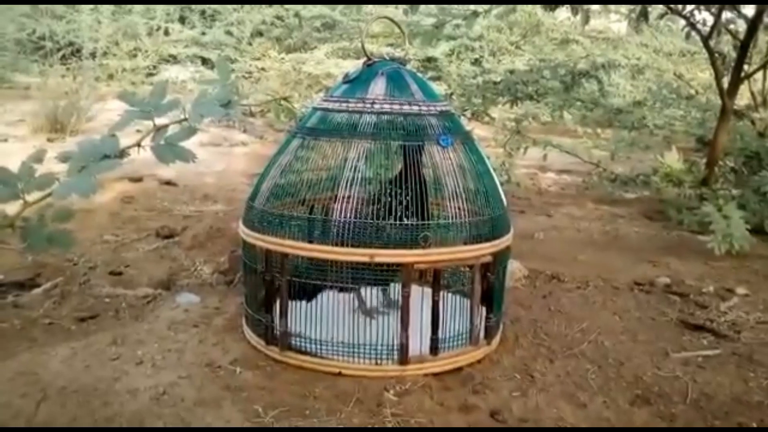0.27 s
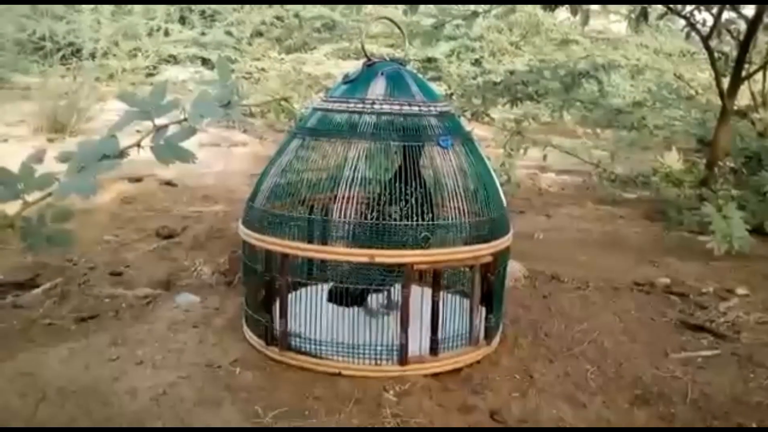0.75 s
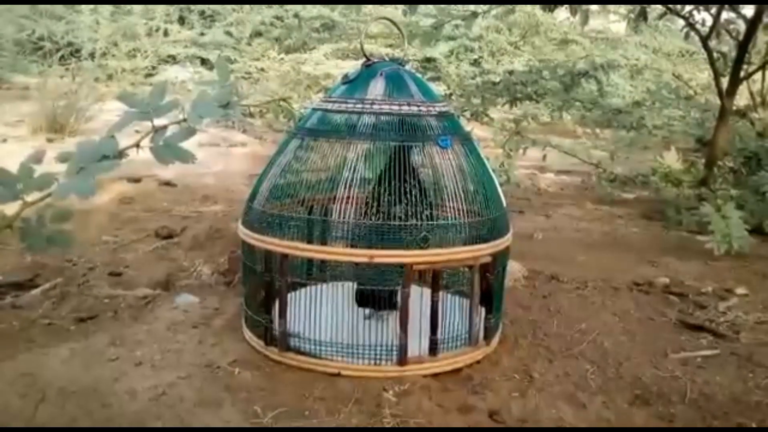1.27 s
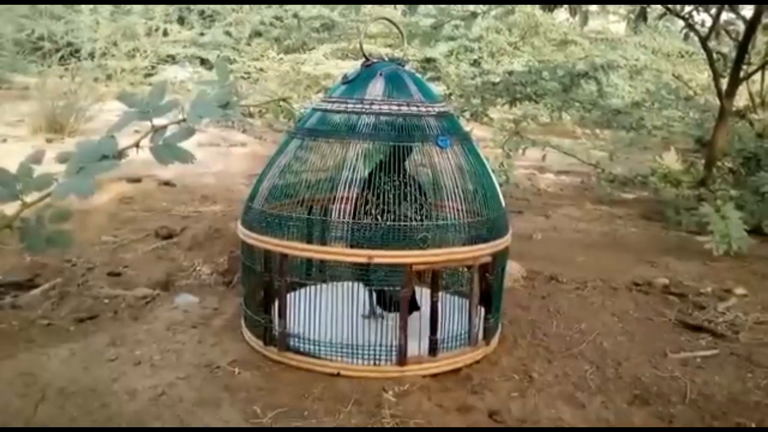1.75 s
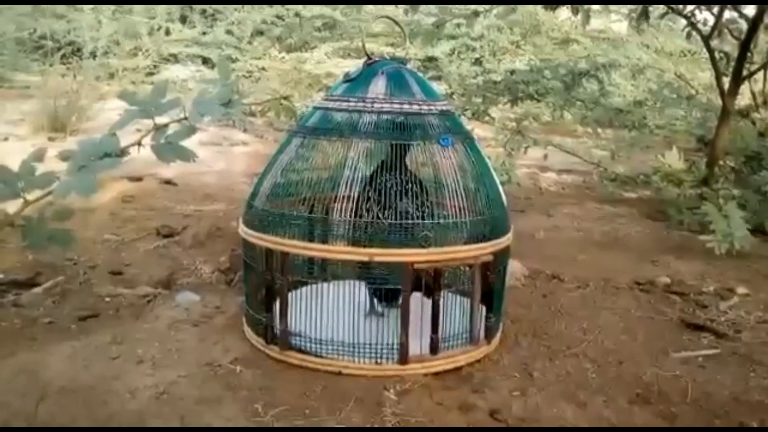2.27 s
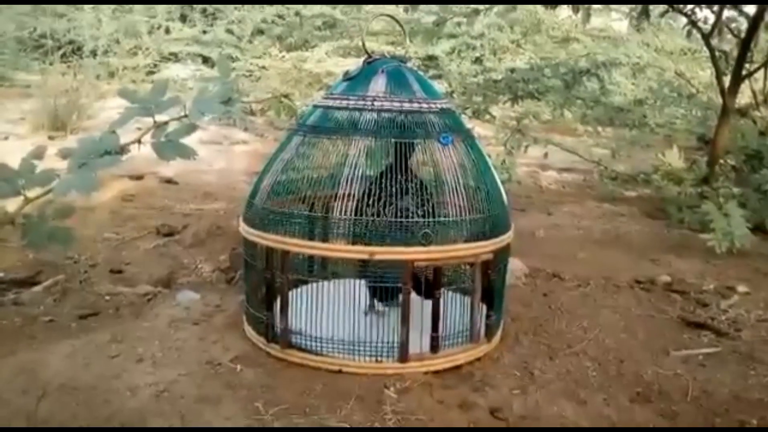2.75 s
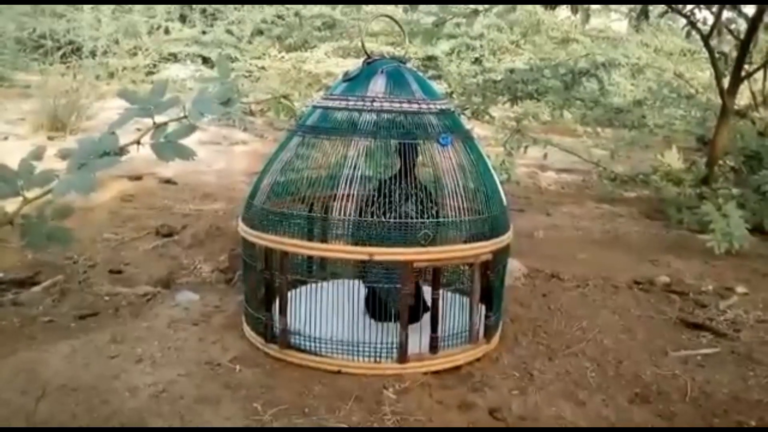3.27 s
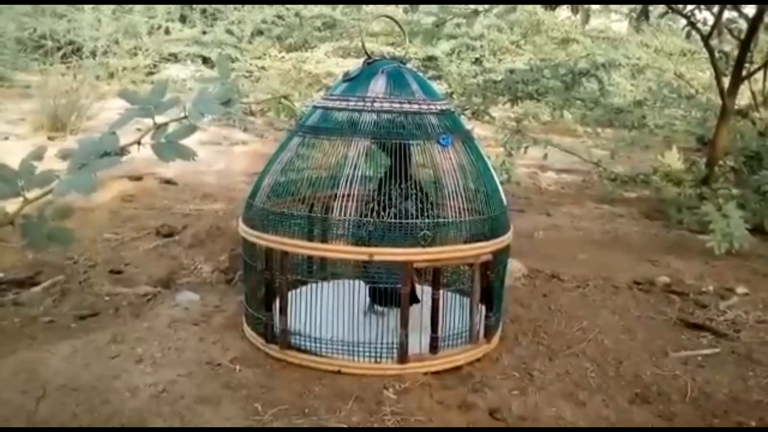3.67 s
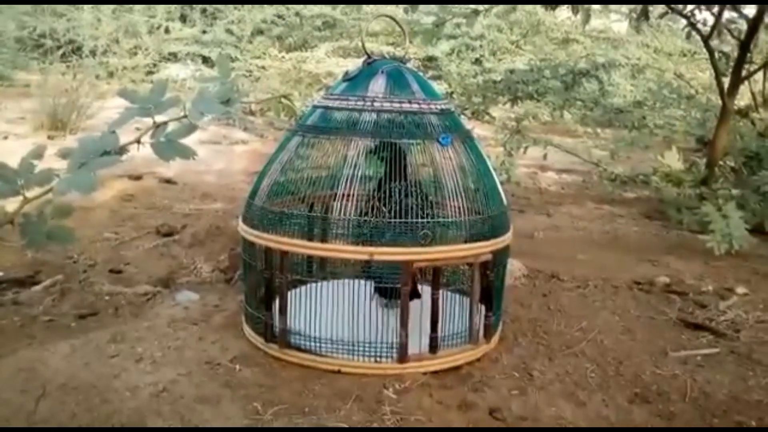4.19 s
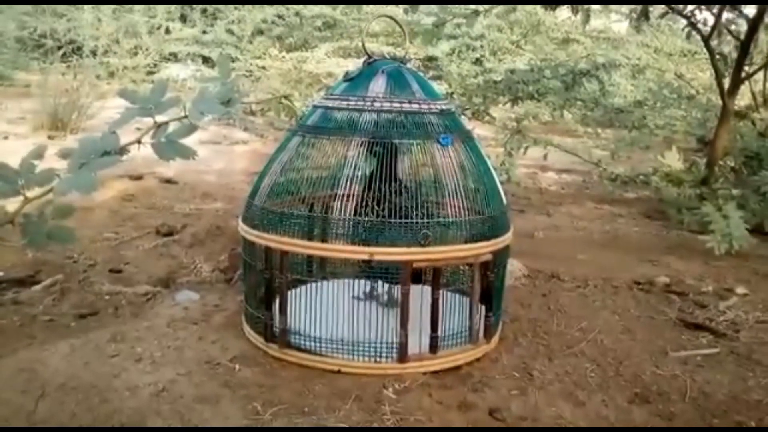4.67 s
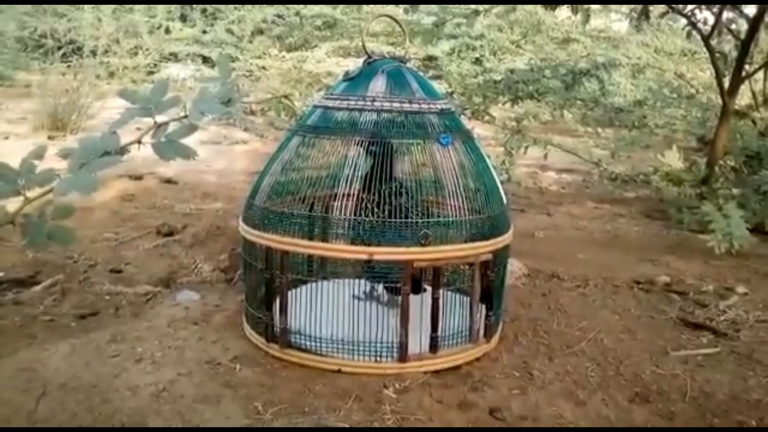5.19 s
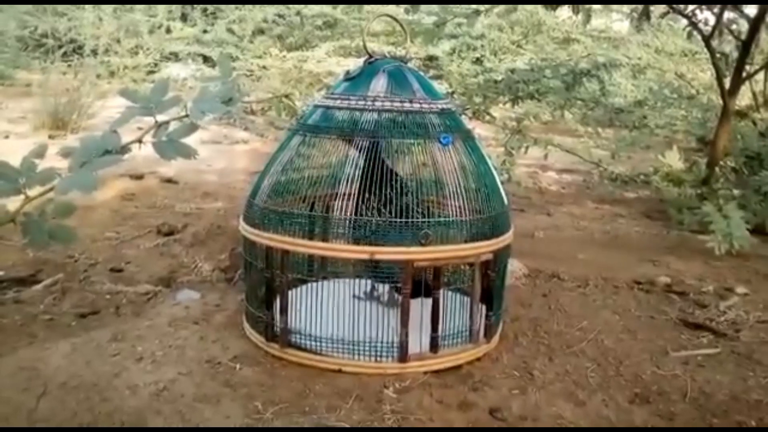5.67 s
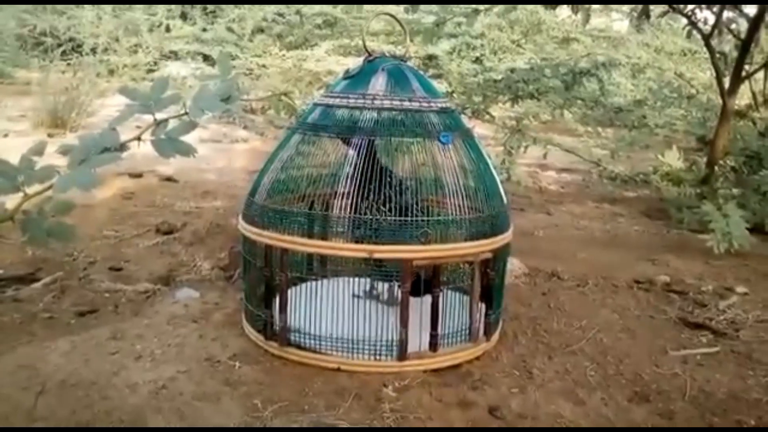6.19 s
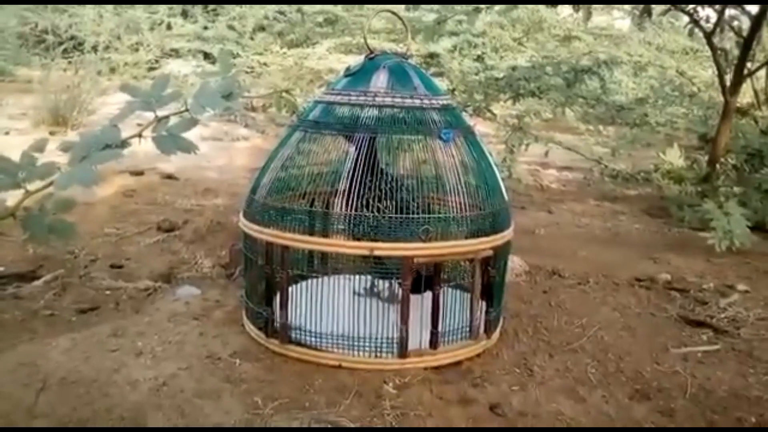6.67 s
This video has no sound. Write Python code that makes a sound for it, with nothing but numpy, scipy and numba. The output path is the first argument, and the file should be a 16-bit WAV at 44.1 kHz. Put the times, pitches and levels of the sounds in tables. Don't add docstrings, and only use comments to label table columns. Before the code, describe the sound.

A caged francolin close by clucks, then lets out harsh, overloaded rasping cries outdoors, with a far nasal piping bird, faint twitter and low hum.

```python
import sys
import numpy as np
from scipy import signal
from scipy.fft import rfft, irfft
from scipy.io import wavfile
from scipy.ndimage import uniform_filter1d
from numba import njit

SR = 44100
rng = np.random.default_rng(int(sys.argv[2]) if len(sys.argv) > 2 else 0)


def transcribe(u):
    v = np.clip(np.atleast_2d(u).T, -1, 1)
    q = np.round(v * 32767).astype(np.int16)
    wavfile.write(sys.argv[1], SR, q)


def convert_level_to_amplitude(level_db):
    exponent = np.asarray(level_db, float) / 20
    return 10 ** exponent


N = 306054
T = np.arange(N) / SR

# start_s, length_s, level_db, snaps_per_s, speedup_per_s (at mid-syllable)
RASPS = [
    (2.257, 0.16, -7, 292, 90),
    (2.61, .180, -7, 303, -5),
    (2.82, 0.037, -6, 340, -0.5),
    (3.107, 0.099, -7, 271, 90),
    (3.264, .071, -7.5, 310, 14.5),
    (3.352, 0.099, -8, 310, -50),
]
# centre_hz, width_hz, level_db
THROAT_MODES = [(3150, 400, -12), (4200, 600, 0), (4900, 400, -2), (6300, 350, -10)]
# time_s, pitch_hz, level_db
CLUCK_CURVE = [(1.787, 1453, -36), (1.791, 1458, -9), (1.796, 1155, -13.5), (1.798, 835, -11.5),
               (1.808, 809, -14), (1.810, 788, -19.5), (1.813, 720, -19), (1.816, 782, -23.5),
               (1.827, 766, -31)]
# frequency_hz, level_db
CLUCK_THROAT = [(800, -72.5), (1650, -8), (2500, -6.5), (3300, -8), (4200, 5), (5000, 3), (5900, -7),
                (6700, -9.5), (7600, -50.5)]
# start_s, length_s, top_hz, level_db
WHISTLES = [
    (1.8328, .0308, 6500, -11),
    (2.786, .033, 6390, -12.5),
    (3.332, .022, 6490, -12.5),
]
# start_s, ring_s, pitch_hz, level_db
YELPS = [
    (1.8302, .0016, 4050, -1),
    (1.8648, .006, 4100, -1.5),
]
# arrival_s, buildup_s, level_db, decay_db_per_s
ECHOES = [
    (0, .001, -48, 1399),
    (0, .001, -63, 118.5),
    (.418, .04, -83, 74),
]
# time_s, peak_db
CLAW_TICKS = [
    (5.1394, -45),
    (5.6717, -31.5),
    (5.74, -36),
]
# start_s, length_s, second_partial_hz, level_db, brightness_db (per partial)
PIPES = [(0.194, 0.063, 2836, -40, -0.5), (0.319, 0.088, 2826, -46, -0.5), (1.211, 0.057, 2724, -42, -2.5),
         (1.332, 0.068, 2740, -43, 1), (1.454, 0.087, 2698, -45, 1), (2.216, .045, 2710, -47.5, -1.5),
         (2.499, 0.12, 2734, -40.5, -1), (3.501, 0.073, 2660, -57, 3.5)]
# start_s, length_s, second_partial_hz, level_db, brightness_db
SLIDES = [
    (.459, .261, 2755, -50, 0),
    (1.61, .17, 2780, -46, -2),
    (3.65, .175, 2680, -60, -2),
]
# start_s, length_s, second_partial_hz, level_db, brightness_db
COOS = [(1.03, .055, 2520, -57, -2), (1.082, .1, 2800, -56, -12), (4.765, .04, 2410, -61, -8),
        (5.62, .04, 2600, -65, -8), (5.69, .035, 2600, -65, -8), (5.785, .035, 2600, -65, -8),
        (6.205, .045, 2400, -63, -8)]
# length_share, pitch_ratio, swell_db
LEVEL_SHAPE = [(0, .975, 0), (.45, 1.005, 0), (.86, .993, 2), (1, .94, -7)]
# before_end_s, pitch_ratio, swell_db
SLIDE_SHAPE = [(.155, .97, 0), (.112, .895, -3), (.058, .735, -12), (.04, .74, -11), (.014, .82, -6),
               (0, .825, -5)]
# from_s, third_db, fourth_db, fifth_db (partials over the second)
HEAD_TURNS = [(0, -4, 0, -19), (1.0, 3, 2, -9), (2.2, -4, -12, -12), (3.4, -8, -4, -14)]
# start_s, length_s, top_hz, level_db
CHIRPS = [(0.314, 0.073, 5000, -54), (0.681, 0.038, 4550, -58), (.727, 0.047, 4350, -51),
          (.806, .048, 4670, -56), (.862, .045, 4450, -55), (.918, 0.051, 4430, -53.5),
          (1.065, .03, 4700, -53), (1.654, 0.043, 5250, -53.5), (2.163, 0.029, 4900, -54),
          (5.155, 0.031, 4700, -47), (5.19, .042, 5220, -57.5), (6.845, 0.027, 4920, -56)]
# start_s, length_s, start_hz, end_hz, level_db
GLIDES = [(1.047, .045, 4980, 3920, -70), (1.121, 0.032, 3750, 3560, -56), (2.004, .023, 3320, 4390, -56),
          (4.287, .021, 2484, 1950, -60), (4.792, 0.019, 3770, 4460, -52.5),
          (4.823, 0.051, 4650, 4320, -61), (5.039, 0.036, 2800, 2610, -66.5),
          (5.198, 0.084, 2440, 2290, -66), (5.222, .048, 4700, 3700, -46), (5.248, 0.04, 4170, 5380, -56),
          (5.306, .03, 4840, 4053, -52.5), (5.365, 0.0183, 3970, 5260, -49), (5.383, .061, 4490, 3480, -58),
          (5.862, .03, 4900, 3700, -60), (5.916, 0.017, 3734, 4480, -56), (5.948, .024, 3776, 2250, -53.5),
          (1.689, .045, 4890, 3800, -49.5), (1.625, .03, 4023, 4900, -49), (6.27, 0.023, 3860, 5780, -57.5),
          (6.3, 0.035, 5700, 4240, -62), (6.32, 0.039, 4120, 3740, -57), (6.372, 0.025, 3910, 4650, -62),
          (6.51, 0.036, 5170, 5170, -63), (6.886, .038, 3590, 4400, -54.5)]
# time_s, pitch_hz, level_db
DRONE_CURVE = [(0.0, 99.96, -60), (0.09, 102.4, -49), (1.7, 99.4, -49.5), (2.45, 102.8, -56.5),
               (3.44, 99.6, -50), (3.63, 101.7, -51.5), (5.7, 100.4, -51), (6.94, 101.9, -50.5)]
# multiple, level_db
DRONE_ORDERS = [(1, 0), (1.5, -11), (2, -11), (2.5, -13), (3, -14)]
# start_s, length_s, start_hz, end_hz, level_db
PASSING = [
    (2.6, 2.05, 148, 134, -48.5),
    (4.7, 1.3, 179, 170, -54),
    (6.0, .94, 172, 172, -59),
    (4.7, .12, 96, 90, -47),
]
# frequency_hz, density_db (per Hz)
AIR_SPECTRUM = [(15, -57), (25, -17), (37, -13), (101, -1), (174, -4), (274, -8.5), (305, -8.5), (649, -20),
                (784, -23.5), (2630, -26), (3440, -25.5), (6390, -29), (8150, -43.5), (14300, -45.5),
                (15500, -40)]

DUCK_DB = 12


def spans(tables, edge_s=0.00054):
    s, *columns = np.transpose(np.concatenate(tables))
    gate = 0
    for rows in tables:
        first_s, last_s = rows[0][0], rows[-1][0]
        gate = gate + np.interp(T, [first_s - edge_s, first_s, last_s, last_s + edge_s], [0, 1, 1, 0])
    return np.minimum(gate, 1), [np.interp(T, s, column) for column in columns]


def at_hz(points, hz):
    point_hz, point_db = np.array(points)[:, 0], np.array(points)[:, 1]
    return np.interp(np.log(hz + 1), np.log(point_hz), point_db)


def rms_one(x):
    return x / np.sqrt(np.mean(x ** 2) + 1e-20)


def drift(rate_hz):
    r = np.exp(-2 * np.pi * rate_hz / SR)
    noise = rng.standard_normal(N + SR)
    return rms_one(signal.lfilter([1], [1, -2 * r, r * r], noise)[SR:])


def band(x, low_hz, high_hz, order=2):
    return signal.sosfilt(signal.butter(order, [low_hz, high_hz], "band", fs=SR, output="sos"), x)


def tone(hz):
    return np.sqrt(2) * np.sin(2 * np.pi * np.cumsum(hz) / SR)


@njit
def swing(x, turn, r):
    y = np.zeros(len(x))
    for i in range(2, len(x)):
        y[i] = (1 - r * r) / 2 * (x[i] - x[i - 2]) + turn[i] * y[i - 1] - r * r * y[i - 2]
    return y


def resonance(x, hz, width_hz):
    r = np.exp(-np.pi * width_hz / SR)
    return swing(x, 2 * r * np.cos(2 * np.pi * hz / SR) + np.zeros(N), r)


def syllable(s, length, level_db, rate, speedup):
    attack_s, settle_db = .009, .8
    breaks = min(abs(s + length - w[0]) for w in WHISTLES) < .01
    resumes = min(abs(s - w[0] - w[1]) for w in WHISTLES) < .01
    onset_db = -3.5 if resumes else -14
    fade_s, sag_db, end_db = (.0045, 0, -9) if breaks else (.012, -5, -25)
    corners = [0, attack_s, length - fade_s - .016, length - fade_s, length]
    fastest_s = .55 * length
    age = np.sort(np.append(corners, fastest_s))
    shape_db = np.interp(age, corners, [onset_db, settle_db, 0, sag_db, end_db])
    snaps = rate + speedup * np.interp(age, [0, fastest_s, length], [0, 1, -.6])
    main_hz = 4240 + 0 * age
    upper_hz = 5420 + 20000 * age ** 2
    chest_db = 6 * (age <= attack_s)
    return np.transpose([s + age, level_db + shape_db, main_hz, upper_hz, snaps, chest_db])


def rasp(jitter=.011, uneven_db=1.0, breath_db=-24, sweep=.21, wander=.022, open_share=.66, leak=.4):
    gate, (level_db, main_hz, upper_hz, snaps, chest_db) = spans([syllable(*row) for row in RASPS])
    cycles = np.cumsum(snaps * (1 + jitter * drift(90))) / SR
    phase, count = cycles % 1, cycles.astype(int)
    strength = convert_level_to_amplitude(uneven_db * rng.standard_normal(count[-1] + 1))[count]
    unsteady = wander * drift(20) + .012 * drift(200)
    pitch_hz = main_hz * (1 + sweep * (np.minimum(phase, .8) - .4) + unsteady)
    chop = uniform_filter1d(np.where(phase < open_share, 1, leak) * strength, size=20)
    main = convert_level_to_amplitude(4) * tone(pitch_hz)
    second = convert_level_to_amplitude(-8) * tone(pitch_hz * upper_hz / main_hz)
    voice = chop * (main + second)
    breath = convert_level_to_amplitude(breath_db) * rng.standard_normal(N) * np.exp(-1.5 * phase)
    drive = (np.diff(count, prepend=0) > 0) * strength + breath
    rings = -convert_level_to_amplitude(-4) * resonance(drive, upper_hz, 450)
    for k, (hz, width_hz, db) in enumerate(THROAT_MODES):
        rings += (-1) ** k * convert_level_to_amplitude(db) * resonance(drive, hz, width_hz)
    low = convert_level_to_amplitude(-20) * rms_one(band(resonance(drive, 2620, 600), 2300, 3300, order=3))
    chest = convert_level_to_amplitude(chest_db - 39) * rms_one(resonance(resonance(drive, 1600, 300), 1620, 450))
    voice = band(rms_one(voice) + convert_level_to_amplitude(-4.5) * rms_one(rings), 3000, 5935, order=4) + low + chest
    even = np.sqrt(uniform_filter1d(voice ** 2, size=330))
    return gate * convert_level_to_amplitude(level_db + 1.5) * voice / even


def cluck():
    gate, (hz, level_db) = spans([CLUCK_CURVE])
    hz = hz * (1 + 0.012 * drift(190))
    smear = rng.uniform(0, 2 * np.pi, 10)
    turn = 2 * np.pi * np.cumsum(hz) / SR
    stack = sum(convert_level_to_amplitude(at_hz(CLUCK_THROAT, k * hz)) * np.sin(k * turn + smear[k]) for k in range(1, 10))
    hoarse = rms_one(band(resonance(rng.standard_normal(N), 4500, 1200), 2800, 6800, order=4))
    return gate * (convert_level_to_amplitude(level_db) * stack + convert_level_to_amplitude(.7 * level_db - 11) * hoarse)


def whistle():
    climb_hz_per_s, top_at, drop_s, drop_hz = 13000, .54, .002, 5200
    pure = []
    for s, length, hz, db in WHISTLES:
        top_s = top_at * length
        pure.append([(s, hz - climb_hz_per_s * top_s, db + 2), (s + top_s, hz, db),
                     (s + length - drop_s, .985 * hz, db + 4), (s + length, drop_hz, db + 4)])
    yelps = []
    for s, ring_s, hz, db in YELPS:
        yelps.append([(s - .001, hz, db - 3.0), (s, hz, db), (s + ring_s, hz, db - 3500 * ring_s)])
    gate, (hz, level_db) = spans([yelps[0] + pure[0] + yelps[1]] + pure[1:])
    breath = convert_level_to_amplitude(-19) * rms_one(resonance(resonance(rng.standard_normal(N), 4200, 700), 4200, 900))
    return gate * convert_level_to_amplitude(level_db + 0.31 * drift(120)) * (tone(hz) + convert_level_to_amplitude(-31.5) * tone(hz / 2) + breath)


def scrub(x):
    delay = np.arange(SR) / SR
    height = 0
    for s, rise_s, db, fall_db in ECHOES:
        buildup = np.clip(1 + (delay - s) / rise_s, 0, 1) ** 2
        height = height + convert_level_to_amplitude(db - fall_db * np.maximum(delay - s, 0)) * buildup
    answer = height * rng.standard_normal(SR)
    sideways = x - .55 * resonance(x, 4250, 800)
    return signal.fftconvolve(sideways, band(answer, 1900, 5800))[:N]


def ticks():
    out = np.zeros(N)
    for s, peak_db in CLAW_TICKS:
        out[round(s * SR)] = convert_level_to_amplitude(peak_db + 10.5)
    return band(out, 3000, 6700)


def piped_notes():
    voiced = [row[0] for row in PIPES + SLIDES]
    notes = []
    for row in sorted(PIPES + SLIDES + COOS):
        s, length, hz, level_db, bright_db = row
        if row in SLIDES:
            shape = [(0.00029, 0.98, 0)] + [(length - before, ratio, db) for before, ratio, db in SLIDE_SHAPE]
        else:
            shape = [(share * length, ratio, db) for share, ratio, db in LEVEL_SHAPE]
        follows = any(0 < s - earlier < .3 for earlier in voiced)
        period_s, closing_s = (.0135, .066) if follows else (.0085, .032)
        if row in COOS:
            closing_s = 1 / SR
        rows = [(s + age, hz * ratio, level_db + db) for age, ratio, db in shape]
        notes.append((rows, bright_db, period_s, closing_s))
    return notes


def piping(first_gap_s=.007, gap_s=.0028, edge_s=.0008):
    tables, *per_note = zip(*piped_notes())
    gate, (hz, swell_db) = spans(tables)
    starts = np.array([rows[0][0] for rows in tables])
    note = np.maximum(np.searchsorted(starts, T + .005) - 1, 0)
    age = T - starts[note]
    bright_db, period, closing = np.array(per_note)[:, note]
    from_gap = period * np.abs(((age - first_gap_s) / period + .5) % 1 - .5)
    stutter = np.clip((from_gap - gap_s * (1 - age / closing)) / edge_s, .05, 1)
    sag_db = -.022 * np.maximum(2450 - hz, 0)
    phrase_s, *upper_db = np.transpose(HEAD_TURNS)
    phrase = np.searchsorted(phrase_s, T, side="right") - 1
    part_db = [0] + [db[phrase] for db in upper_db]
    notes = sum(convert_level_to_amplitude(db + k * (sag_db + bright_db)) * tone(hz * (k + 2) / 2) for k, db in enumerate(part_db))
    return gate * stutter * convert_level_to_amplitude(swell_db) * notes


def twitter(upper=1.15, upper_db=-9, point=1.5):
    out = np.zeros(N)
    foot = 0.78
    midway = .25
    arches = [(s, length, foot * hz, hz, foot * hz, db) for s, length, hz, db in CHIRPS]
    glides = [(s, length, a, a + midway * (b - a), b, db) for s, length, a, b, db in GLIDES]
    for s, length, start_hz, middle_hz, end_hz, level_db in arches + glides:
        u = np.linspace(-1, 1, round(length * SR))
        bend_hz = (start_hz + end_hz) / 2 - middle_hz
        hz = middle_hz + (end_hz - start_hz) / 2 * u + bend_hz * np.abs(u) ** point
        at = round(s * SR)
        note = convert_level_to_amplitude(level_db) * np.sqrt(1 - u ** 2) * (tone(hz) + convert_level_to_amplitude(upper_db) * tone(upper * hz))
        out[at:at + len(u)] += note[:N - at]
    return out * convert_level_to_amplitude(4.0 * drift(60))


def engines():
    gate, (hz, level_db) = spans([DRONE_CURVE])
    hz = hz * (1 + .003 * drift(2))
    out = sum(convert_level_to_amplitude(level_db + order_db + 0.83 * drift(0.25)) * tone(k * hz) for k, order_db in DRONE_ORDERS)
    for s, length, start_hz, end_hz, level_db in PASSING:
        gate, (hz,) = spans([[(s, start_hz), (s + length, end_hz)]], edge_s=0.13)
        out += gate * convert_level_to_amplitude(level_db + 1.2 * drift(2.9)) * tone(hz)
    return out


def air():
    colour = convert_level_to_amplitude(at_hz(AIR_SPECTRUM, np.fft.rfftfreq(N, 1 / SR)))
    coloured = irfft(rfft(rng.standard_normal(N)) * colour, N)
    bright_hiss = rms_one(band(rng.standard_normal(N), 3600, 4700))
    insects = rms_one(band(rng.standard_normal(N), 14200, 15100))
    return convert_level_to_amplitude(-48 + drift(1.1) / 2) * rms_one(coloured) + convert_level_to_amplitude(-74) * insects + convert_level_to_amplitude(-62.5) * bright_hiss


def scene():
    near = convert_level_to_amplitude(DUCK_DB) * (rasp() + cluck() + whistle())
    piper, small = piping(), twitter()
    echoes = scrub(near + convert_level_to_amplitude(10) * piper + convert_level_to_amplitude(26) * small)
    return (near + echoes + piper + small + ticks() + engines() + air())[None]


def roll_off(x):
    return signal.sosfilt(signal.butter(12, 15690, fs=SR, output="sos"), x)


def record(dry, start_db=-26, release_db=170, attack_s=.001):
    level_db = 10 * np.log10(uniform_filter1d(dry[0] ** 2, size=130) + 1e-12)
    duck_db = np.clip(.7 * (level_db - start_db), 0, DUCK_DB)
    held_db = np.maximum.accumulate(duck_db + release_db * T) - release_db * T
    r = np.exp(-1 / (attack_s * SR))
    gain = convert_level_to_amplitude(-signal.lfilter([1 - r], [1, -r], held_db))
    loud = np.clip(dry * gain, -.89, .89)
    mix = signal.sosfilt(signal.cheby2(14, 55, 15720, fs=SR, output="sos"), loud)
    return roll_off(mix)


dry = scene()
out = record(dry)
transcribe(out)
```